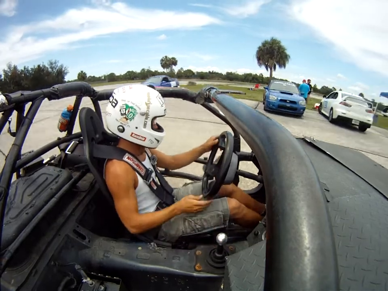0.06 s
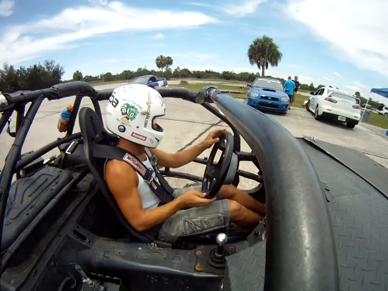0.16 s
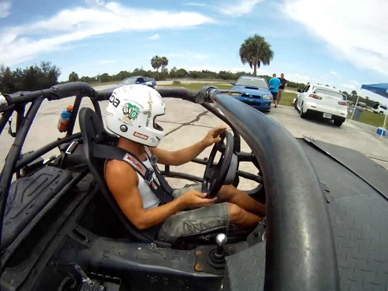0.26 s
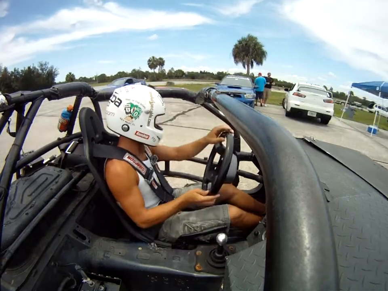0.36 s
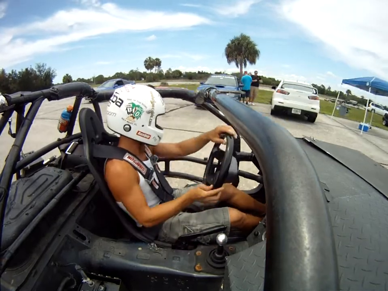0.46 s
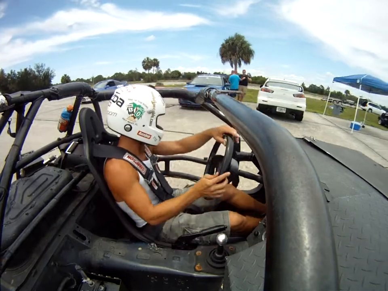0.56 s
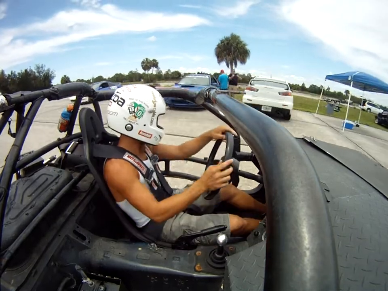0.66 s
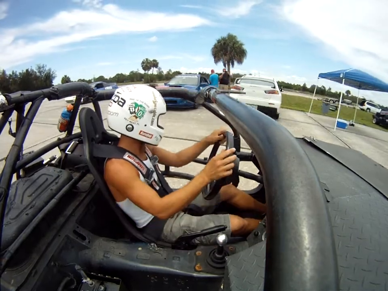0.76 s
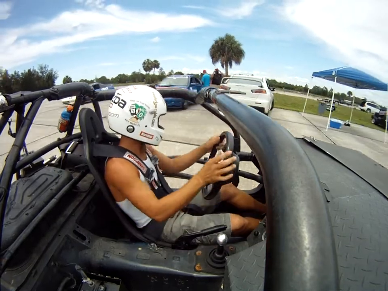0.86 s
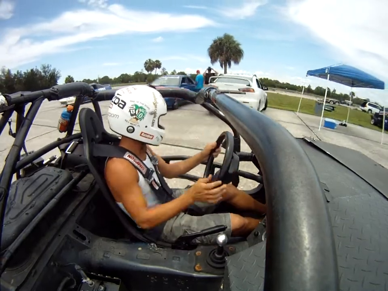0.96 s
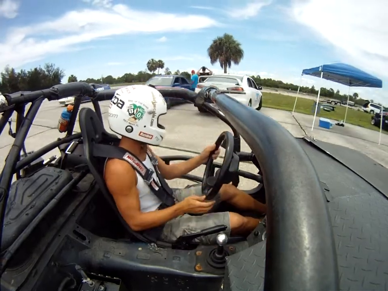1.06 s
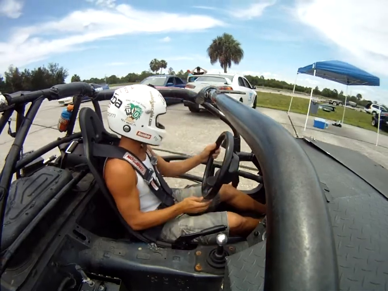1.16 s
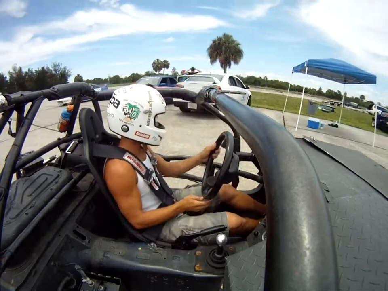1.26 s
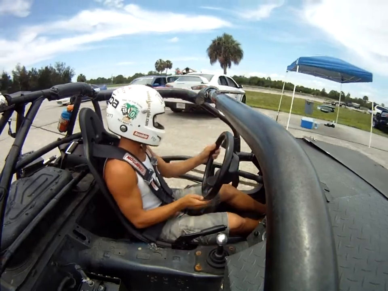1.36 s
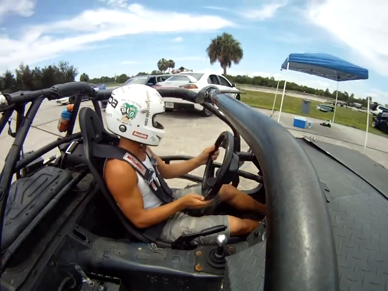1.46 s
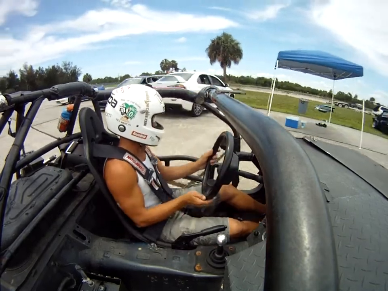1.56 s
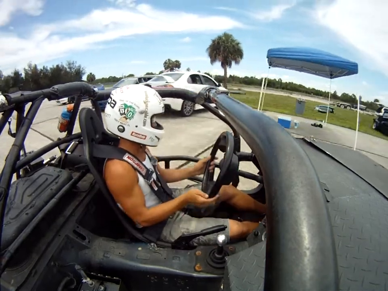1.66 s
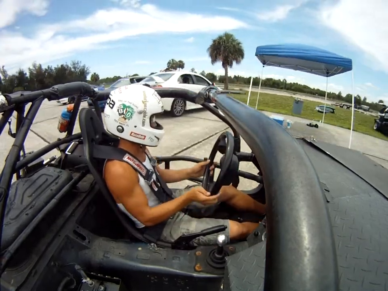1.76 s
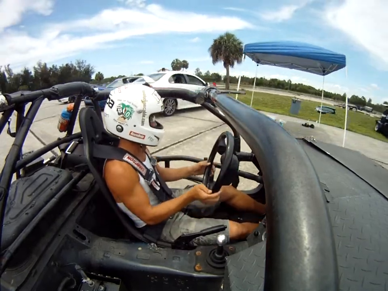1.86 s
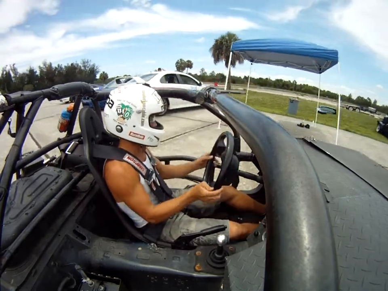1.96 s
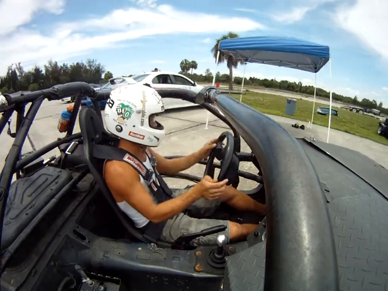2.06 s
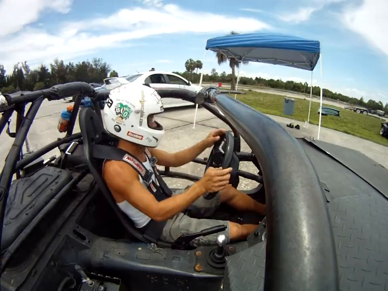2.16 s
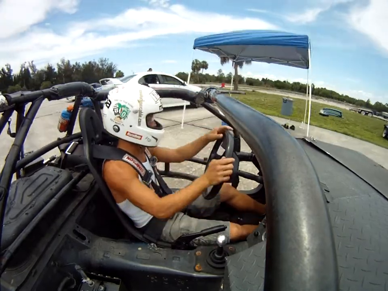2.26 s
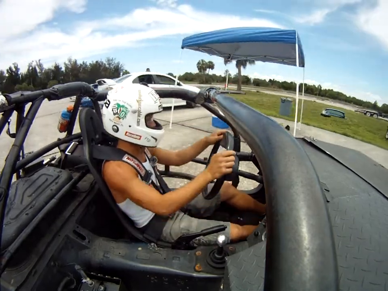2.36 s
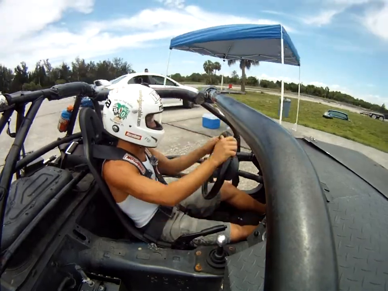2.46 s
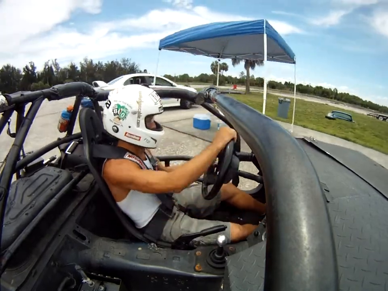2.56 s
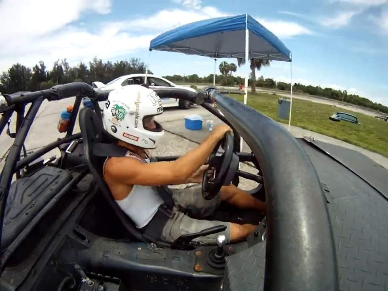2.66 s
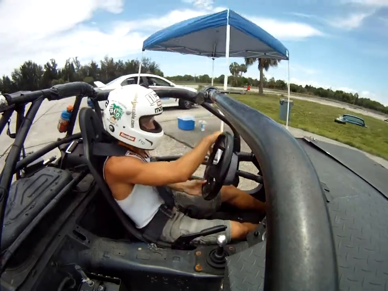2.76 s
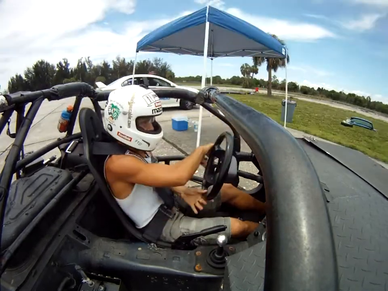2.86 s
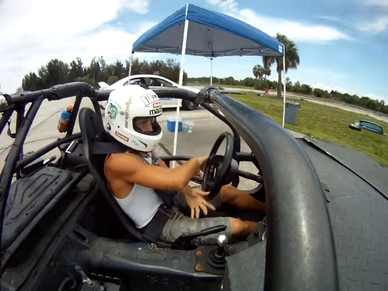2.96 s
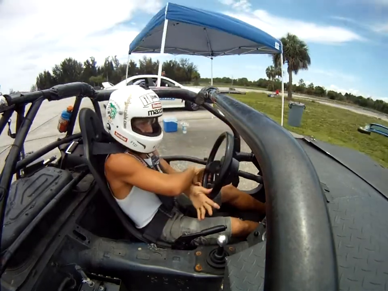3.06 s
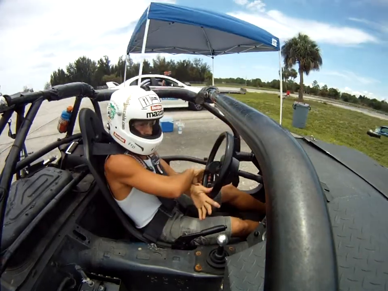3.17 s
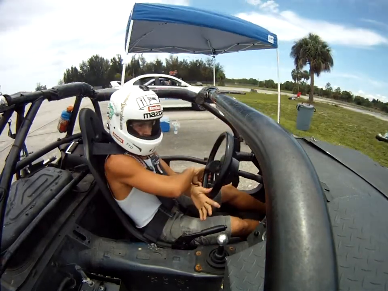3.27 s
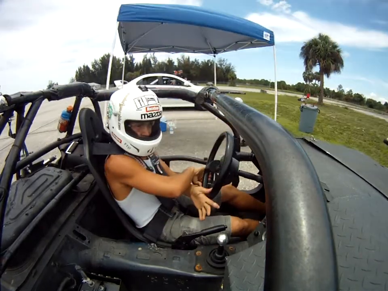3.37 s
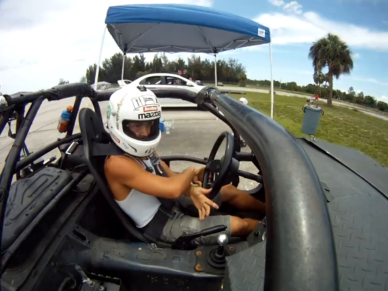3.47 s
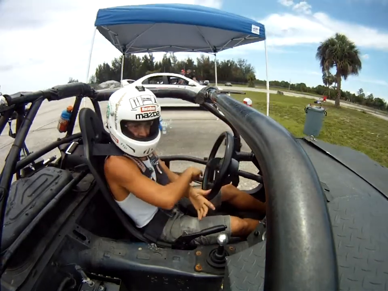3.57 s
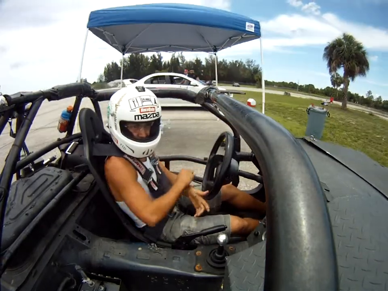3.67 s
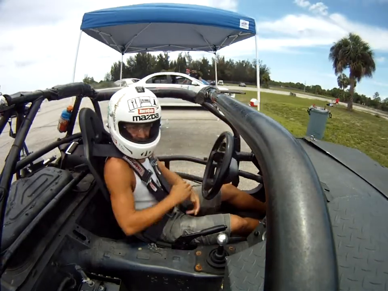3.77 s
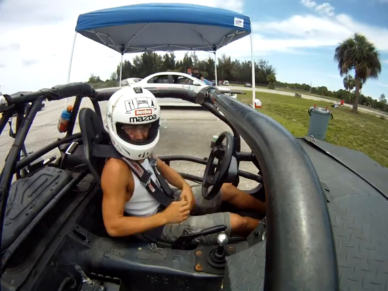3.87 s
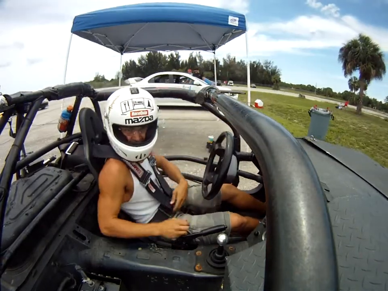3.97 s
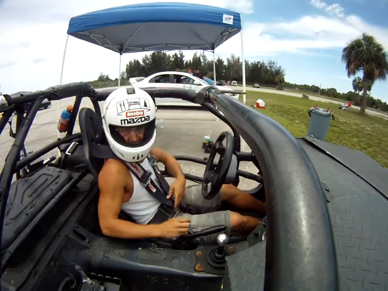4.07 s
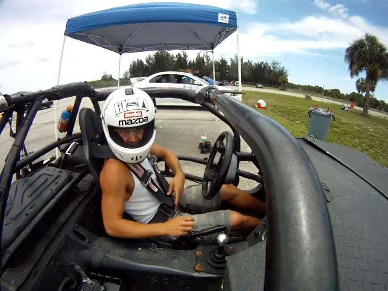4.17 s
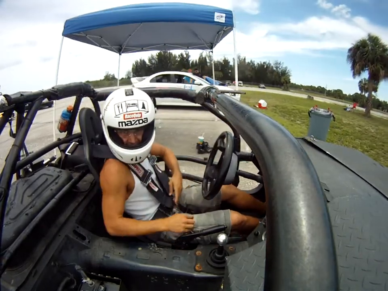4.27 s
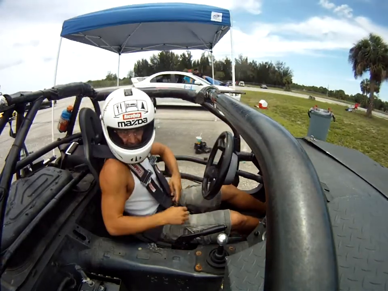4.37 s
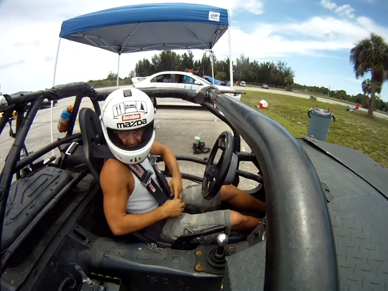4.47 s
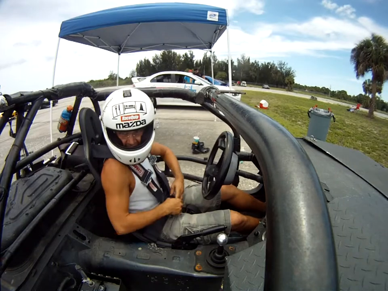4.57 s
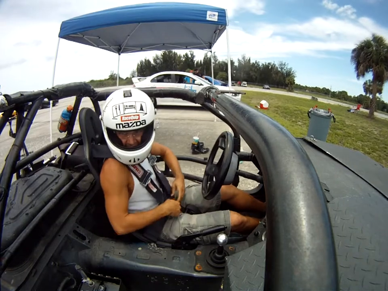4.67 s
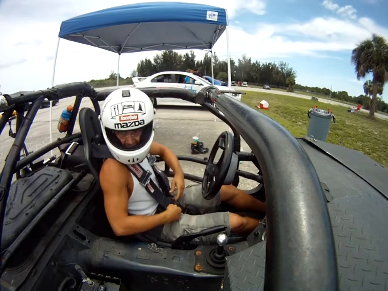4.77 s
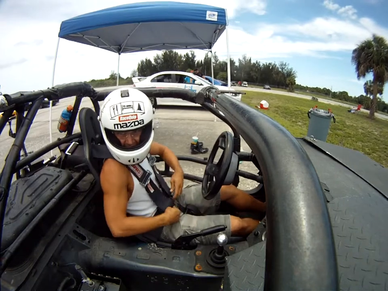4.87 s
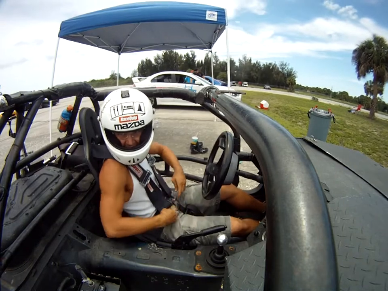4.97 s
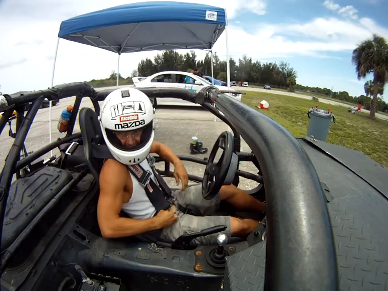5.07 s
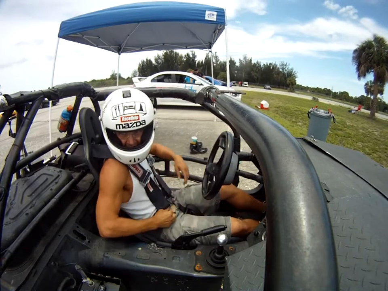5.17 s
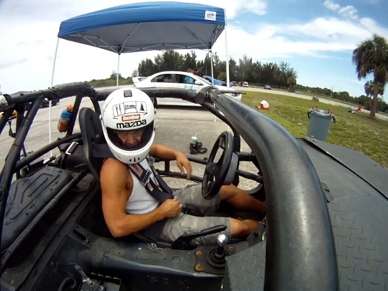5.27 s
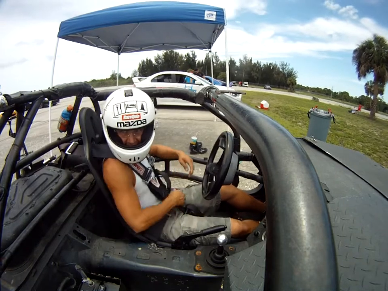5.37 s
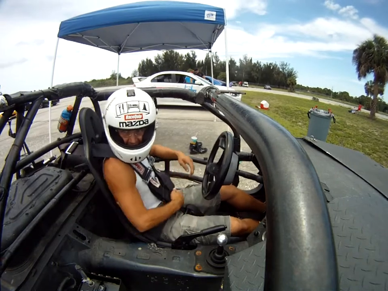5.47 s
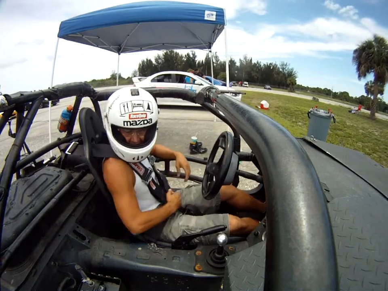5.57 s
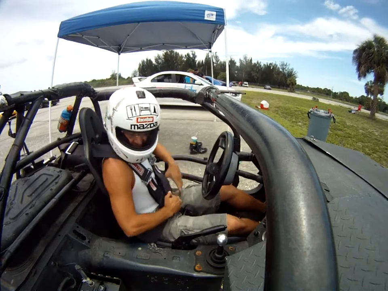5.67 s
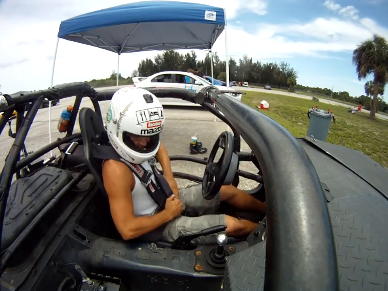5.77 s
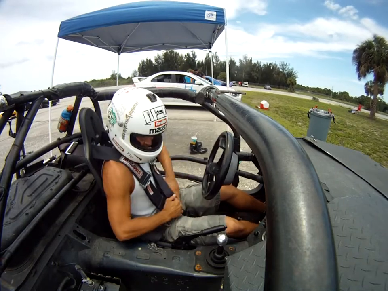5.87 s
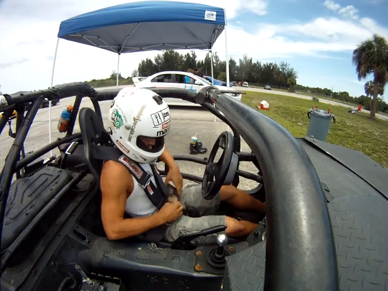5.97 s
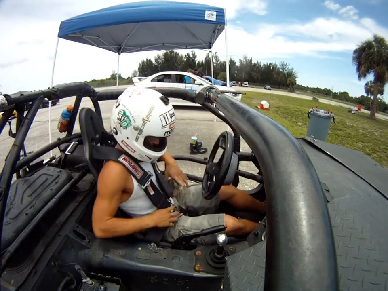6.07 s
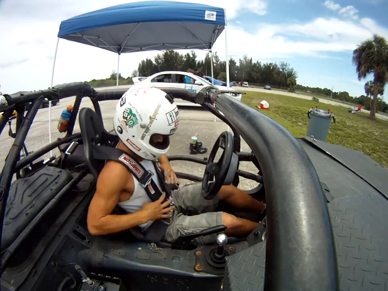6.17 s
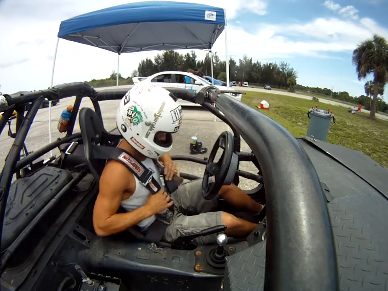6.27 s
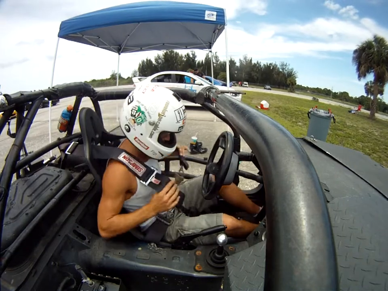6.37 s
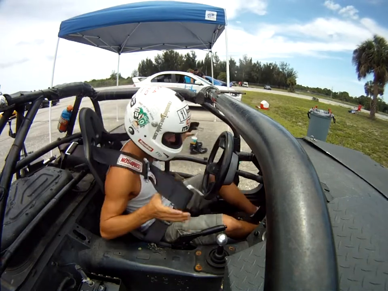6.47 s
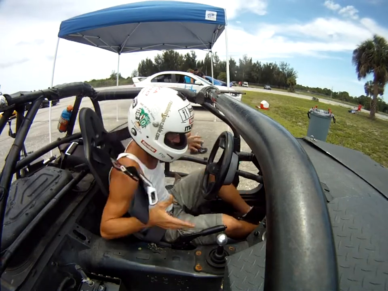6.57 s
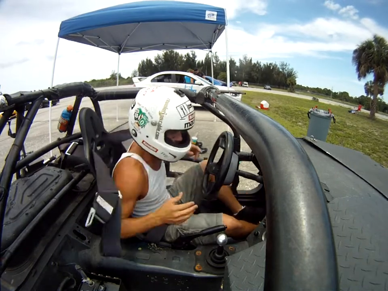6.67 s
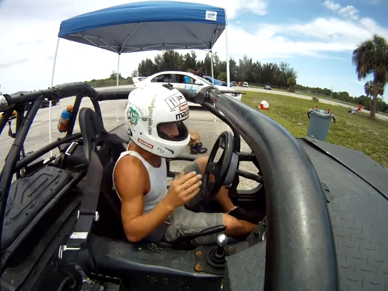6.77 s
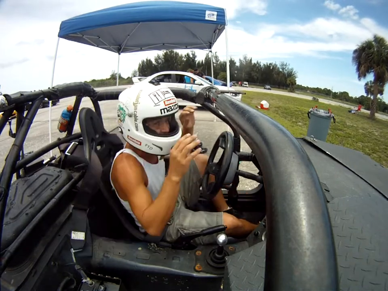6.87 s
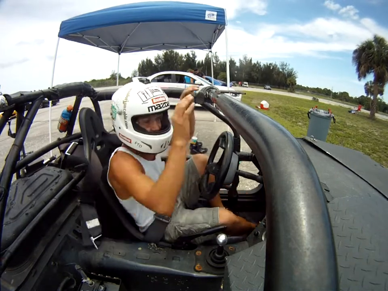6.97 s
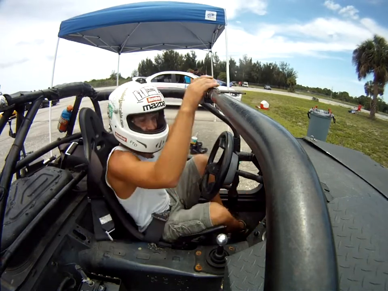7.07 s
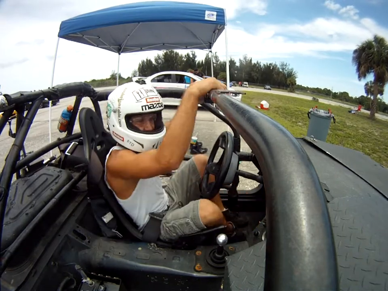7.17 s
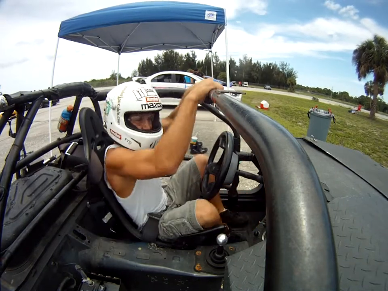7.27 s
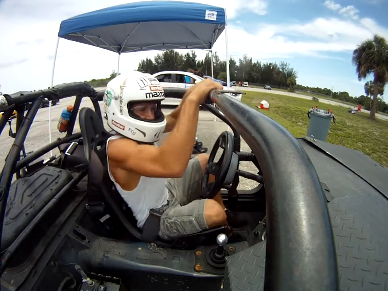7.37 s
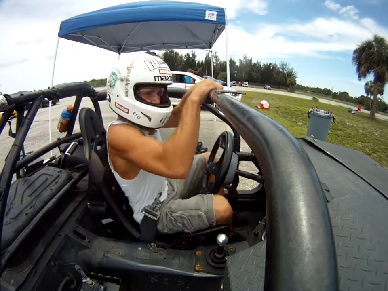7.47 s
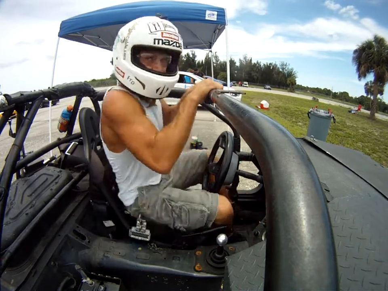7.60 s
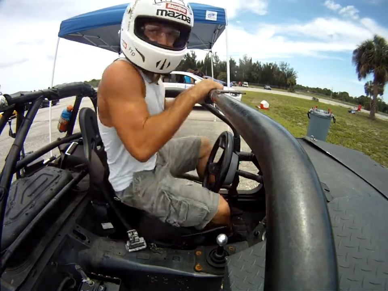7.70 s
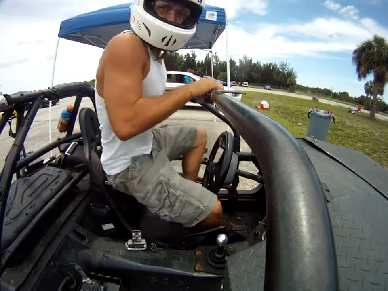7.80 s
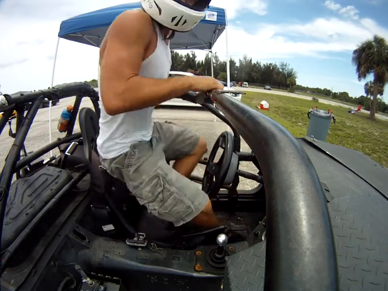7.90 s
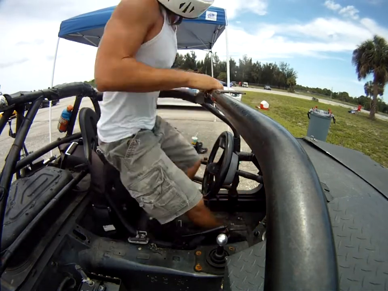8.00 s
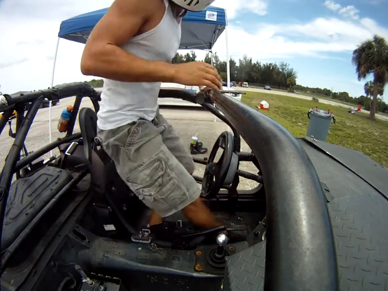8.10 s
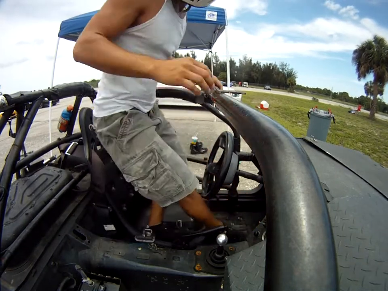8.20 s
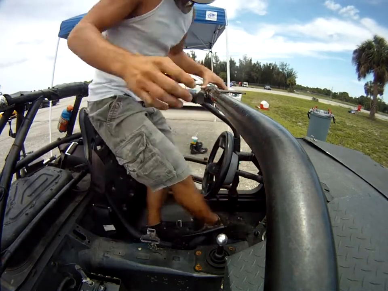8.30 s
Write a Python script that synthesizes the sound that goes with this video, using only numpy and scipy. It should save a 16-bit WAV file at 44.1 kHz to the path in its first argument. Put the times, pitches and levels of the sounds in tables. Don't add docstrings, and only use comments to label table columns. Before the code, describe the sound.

Muffled low rolling rumble, one buzzing engine rev that sinks and dies, a quiet pause, then sharp metal clinks, strap slaps and foot knocks close by.

```python
import sys
import numpy as np
from scipy import signal
from scipy.io import wavfile
from scipy.ndimage import uniform_filter1d

SR = 44100
rng = np.random.default_rng(int(sys.argv[2]) if len(sys.argv) > 2 else 0)


def gain_from_db(level_db):
    decades = np.asarray(level_db, float) / 20
    return 10 ** decades


def transcribe(u):
    v = np.clip(np.atleast_2d(u).T, -1, 1)
    q = np.round(v * 32767).astype(np.int16)
    wavfile.write(sys.argv[1], SR, q)


N = 367794

# centre_hz, width_hz, level_db
SEAT_MODES = [(146.5, 45, 6), (288, 68, -7), (377, 46, -7)]
# centre_hz, width_hz, level_db
DRONE_MODES = [(207, 100, -6.5), (314.3, 26, 6), (393, 80, -1), (449, 123, -8), (550, 590, -20)]
# centre_hz, width_hz, level_db
CASE_MODES = [(711.4, 49.5, 1), (963, 77, 1.5), (1160, 114, 2), (1450, 109, -1.5), (1592, 198, -2.5),
              (1853, 108, -1), (2096, 100, 0), (2560, 245, -8), (2794, 460, -12)]
# centre_hz, width_hz, level_db
SHELL_MODES = [(2523, 138, 29.5), (2920, 3400, 1), (2830, 300, -35), (3686, 96, 18.5), (3960, 96, 16),
               (5200, 420, 2.5)]
# centre_hz, width_hz, level_db
HISS_BANDS = [(2470, 2500, 6), (3595, 360, 7), (4154, 1310, 3.5), (5710, 200, 0)]
# peak_s, level_db, rise_s, fall_s
WEIGHT_SHIFTS = [
    (6.99, -44, 0.36, 0.99),
    (7.3, -54, 0.66, 1),
    (7.74, -31, 0.085, .14),
    (8.03, -43, 0.16, 0.62),
    (8.3, -60, 0.35, .4),
]


def curves(rows):
    s, *columns = np.transpose(rows)
    return [np.interp(np.arange(N) / SR, s, c) for c in columns]


def rms_one(x):
    return x / np.sqrt(np.mean(x ** 2) + 1e-20)


def drift(rate):
    steps = rng.standard_normal(4000)
    return np.interp(np.arange(N) / SR * rate * 2, np.arange(len(steps)), steps) * 1.33


def resonate(x, modes, passes=1, gains_db=None):
    total = 0
    for k, (hz, width, db) in enumerate(modes):
        r = np.exp(-np.pi * width / SR)
        poles = [1, -2 * r * np.cos(2 * np.pi * hz / SR), r * r]
        y = x
        for _ in range(passes):
            y = signal.lfilter([(1 - r * r) / 2, 0, (r * r - 1) / 2], poles, y)
        gain_db = db + (0 if gains_db is None else gains_db[k])
        total = total + (-1) ** k * gain_from_db(gain_db) * y
    return total


def shaken(modes, passes, patchy_db, rate):
    flicker = [patchy_db * drift(rate) for _ in modes]
    return rms_one(resonate(rng.standard_normal(N), modes, passes, flicker))


def evened(x, amount):
    envelope = np.sqrt(uniform_filter1d(x ** 2, size=SR // 20) + .02)
    return rms_one(x / envelope ** amount)


def swells(rows):
    span_db = 20
    t = np.arange(0, N + 64, 64) / SR
    power = 0
    for s, db, rise, fall in rows:
        away = np.maximum((s - t) / rise, (t - s) / fall)
        power = power + gain_from_db(2 * (db - span_db * away))
    return np.interp(np.arange(N) / SR, t, power)


def follow(shake_db, full_db, share, lumps_db, extra):
    full_shake_db = -17.5
    level_db = full_db + share * (shake_db - full_shake_db) + lumps_db * drift(5.1)
    return 10 * np.log10(gain_from_db(2 * level_db) + extra)


def engine():
    # start_s, firing_hz, effort_db, burble_db
    rev = [
        (2.2, 73.2, -35, -45),
        (2.29, 84, -30, -48),
        (2.38, 96.1, -24, -52),
        (2.47, 120.6, -14, -48),
        (2.55, 143, -11, -45),
        (2.6, 156, -12, -37),
        (2.66, 157.5, -12, -37),
        (2.79, 152.6, -15, -41),
        (3.13, 129.5, -11.5, -38),
    ]
    # start_s, firing_hz, effort_db, burble_db
    run_down = [
        (3.431, 111.3, -15.5, -37),
        (3.762, 94.57, -19, -42),
        (4.031, 81, -16.5, -71),
        (4.17, 77.8, -14.5, -50),
        (4.29, 74.9, -27.5, -54),
        (4.439, 68, -33, -52),
        (4.621, 55.37, -23, -74),
        (4.86, 45, -23, -60),
        (5.3, 31.55, -39, -48),
    ]
    # tone_hz, level_db
    mount = [(45, 0), (62, -17), (80, -6.5), (93, -8), (113, -24), (126, -6.5), (160, -2), (178, -33)]
    # multiple, level_db
    burble_orders = [(1.5, 9.5), (2, 0.5), (2.5, -19), (3, 1.5), (3.5, -3), (4, 8), (5, 8)]
    mount_hz, mount_db = np.transpose(mount)

    def through_mount(tone_hz):
        return np.interp(np.log(tone_hz), np.log(mount_hz), mount_db)

    hz, effort_db, upper_db = curves(rev + run_down)
    t = np.arange(N) / SR
    running = np.clip(np.minimum(t - rev[0][0], run_down[-1][0] - t) * 20, 0, 1)
    phase = 2 * np.pi * np.cumsum(hz) / SR

    one_db = effort_db + through_mount(hz) + 1.5 * drift(21.0)
    two_db = effort_db + through_mount(2 * hz) + 0.5
    two_db = two_db + .3 * np.minimum(2 * hz - 146, 0)
    uneven = 1 + 0.012 * np.sin(phase / 2) + 0.023 * drift(27)
    tone = gain_from_db(one_db) * np.sin(phase) * uneven + gain_from_db(two_db) * np.sin(2 * phase + 2.0)

    half_db = effort_db + through_mount(hz / 2) - 15 + 0.39 * (upper_db + 24)
    tone = tone + gain_from_db(half_db + 3.0 * drift(6)) * np.sin(phase / 2 + .4 * drift(5))

    upper = sum(gain_from_db(db + 2.5 * drift(8)) * np.sin(k * phase + .3 * drift(9)) for k, db in burble_orders)
    upper = resonate(gain_from_db(upper_db - 5.5) * upper, DRONE_MODES)
    return np.sqrt(2) * running * (tone + upper), phase, running, running * gain_from_db(2 * effort_db)


def cage_rumble(shake_db):
    # centre_hz, width_hz, level_db
    cage_modes = [(36.7, 14.8, 3), (59.8, 19.3, 1), (92.8, 15.6, -9)]
    return gain_from_db(shake_db + drift(4.0)) * evened(shaken(cage_modes, 2, 0.24, 18.0), 0.11)


def floor_boom(shake_db):
    # centre_hz, width_hz, level_db
    pan_modes = [(131.6, 10.4, -5.5), (157.3, 12.1, -1)]
    # peak_s, level_db, rise_s, fall_s
    seams = [(0.0, 5.5, 0.11, 0.016), (.52, -25.5, 0.15, 0.023), (.8, -24.5, 0.2, 0.13),
             (.96, -24, 0.14, 0.29), (1.4, -28, 0.6, 0.37), (1.92, -26, 0.39, 0.38),
             (2.31, -20.5, 0.21, 0.28), (2.55, -27.5, 0.13, 0.66), (2.95, -25.5, 0.13, 0.51),
             (3.25, -28, 0.29, 0.063), (4.21, -37, 0.27, 0.47), (4.95, -48, 1, 0.54)]
    # peak_s, level_db, rise_s, fall_s
    caught = [
        (2.5, -23, 0.3, 0.11),
        (3.27, -25, 0.43, .12),
    ]
    pushes = swells(seams) + gain_from_db(2 * 9) * swells(WEIGHT_SHIFTS[3:])
    boom_db = follow(shake_db, -30.5, 0.95, 1.5, pushes)
    boom = gain_from_db(boom_db) * evened(shaken(pan_modes, 2, 0.33, 8.6), 0.32)
    return boom + np.sqrt(swells(caught)) * evened(shaken(pan_modes[:1], 2, 0.3, 9.2), 0.78)


def seat_drone(shake_db, effort):
    pushes = gain_from_db(2 * -25.5) * effort + gain_from_db(2 * 2.5) * swells(WEIGHT_SHIFTS[2:4])
    drone_db = follow(shake_db, -41, 0.81, 1.0, pushes)
    return gain_from_db(drone_db) * shaken(DRONE_MODES, 1, 2.2, 8)


def case_buzz(shake_db, phase, running, effort):
    # peak_s, level_db, rise_s, fall_s
    rattles = [
        (2.55, -28.5, 0.05, 0.095),
        (3.17, -25, 0.21, 0.063),
        (3.45, -40.5, 0.24, 0.8),
        (4.19, -30.5, 0.37, 0.13),
        (1.86, -48, 0.07, .2),
        (2.2, -43.5, 0.14, 0.3),
    ]
    # peak_s, level_db, rise_s, fall_s
    roars = [
        (2.54, -24.5, 0.092, 0.15),
        (3.02, -29, 0.17, 0.13),
        (3.15, -25, 0.33, 0.056),
        (3.95, -38.5, 0.064, 0.72),
        (4.19, -26, 0.38, 0.12),
    ]
    # centre_hz, width_hz, level_db
    lid_modes = [(766.4, 51, 3.5), (1210, 175, 0.5), (1520, 142, 2.5)]
    # peak_s, level_db, rise_s, fall_s
    sizzles = [
        (4.12, -55.5, .4, .25),
        (6.27, -54, 0.035, .1),
        (8.4, -49.5, 0.075, .15),
        (8.06, -50, 0.035, 0.067),
        (6.8, -57, .03, 0.09),
    ]
    firing = gain_from_db(2 * -19) * effort * swells([(2.75, 0.0, 1, 2.27)])
    buzz_db = follow(shake_db, -43.5, 0.53, 1.6, firing + swells(rattles) + swells(WEIGHT_SHIFTS))
    pulsing = 1 + 0.036 * running * np.sin(phase + 1.0)
    buzz = gain_from_db(buzz_db) * pulsing * shaken(CASE_MODES, 1, 0.98, 12)
    buzz = signal.sosfilt(signal.butter(3, 3000.0, fs=SR, output="sos"), buzz)
    shell = gain_from_db(0.87 * buzz_db - 25.0) * shaken(SHELL_MODES[1:], 1, 3.6, 27)
    lid = gain_from_db(1.58 * buzz_db + 13.0) * shaken(CASE_MODES[2:5], 2, 2.7, 25)
    roar = np.sqrt(swells(roars)) * shaken(lid_modes, 2, 1.0, 20)
    sizzle = np.sqrt(swells(sizzles)) * shaken(HISS_BANDS[1:], 2, 3.6, 40)
    return buzz + shell + lid + roar + sizzle


def latch():
    # start_s, peak_db
    ticks = [(2.604, -25), (2.7752, -29), (2.8205, -32), (2.8679, -32), (2.9033, -24.5), (4.117, -48),
             (4.152, -48), (4.178, -52), (4.203, -54), (5.226, -40), (6.197, -31), (7.671, -20),
             (7.696, -42), (7.713, -23), (7.722, -35), (7.747, -25), (7.756, -31), (7.767, -33),
             (7.779, -38)]
    # loudest_s, period_s, level_db, gain_db per tick, loss_db per tick
    chatters = [
        (2.5643, .0155, -18, 5, 26),
        (3.153, .0155, -14, 1.85, 4.5),
    ]
    # centre_hz, width_hz, level_db
    latch_modes = [(3730, 330, -3), (5320, 450, -5.5), (2240, 99, 4)]
    bounce_s, scatter_s, jitter_s = .0065, .004, .0009
    runs = []
    for s, period, db, gain_db, loss_db in chatters:
        for k in range(-7, 5):
            tick_s = s + k * period + jitter_s * rng.standard_normal()
            runs.append((tick_s, db - max(-k * gain_db, k * loss_db)))
    clicks = np.full(N, 1e-18)
    for s, db in runs + ticks:
        clicks[round(s * SR)] = gain_from_db(db + 29.5)
        clicks[round((s + bounce_s) * SR)] = -gain_from_db(db + 22.5)
    tail = signal.lfilter([gain_from_db(-21)], [1, -np.exp(-1 / (scatter_s * SR))], np.abs(clicks))
    return resonate(clicks + tail * rng.standard_normal(N), latch_modes, passes=2)


def knocks(rows, thud_db, bright_db, low_modes):
    # centre_hz, width_hz, level_db
    tube_modes = [(740, 37, -15.5), (1065, 14, 1.5), (1110, 9.9, -1), (1299, 12, -2.5), (1553, 20, -0.5),
                  (1610, 71, 1.5), (1960, 200, -12), (1925, 22, -32), (2110, 39, -4.5), (2370, 41, -22)]
    mix, t = np.zeros(N + SR), np.arange(SR // 4) / SR
    noise = rng.standard_normal((len(rows), len(t)))
    spread = rng.standard_normal((len(rows), len(tube_modes)))
    dull = signal.butter(4, 2500.0, fs=SR, output="sos")
    for (s, db, hz, t60), white, tilt in zip(rows, noise, spread):
        decay = t / max(t60, .01)
        envelope = np.minimum(t / 0.0049, 1) * (gain_from_db(-60 * decay) + gain_from_db(-25.5 - 20 * decay))
        burst = white * (1.9 + white ** 2) * envelope
        body = resonate(burst, tube_modes, gains_db=3 * tilt)
        body = body + gain_from_db(-2.0) * resonate(burst, CASE_MODES[1:])
        body = body + gain_from_db(9.5) * resonate(burst, [(hz, 60.0, 1.5)])
        body = signal.sosfilt(dull, body)
        thud = resonate(burst, low_modes, 2, gains_db=1.5 * tilt)
        bright = resonate(burst * gain_from_db(-60.0 * t), SHELL_MODES, gains_db=1.1 * tilt)
        at = round((s - .003) * SR)
        for y, level_db in [(body, db), (thud, db + thud_db), (bright, db + bright_db)]:
            mix[at:at + len(t)] += gain_from_db(level_db + 3.0) * y / np.abs(y).max()
    return mix[:N]


def frame_knocks():
    # start_s, peak_db, ring_hz, t60_s
    jolts = [
        (0.028, -30.5, 1160, 0.085),
        (0.533, -32.5, 1140, 0.17),
        (0.927, -34.5, 1440, 0.13),
        (1.449, -38.5, 1520, 0.14),
        (6.168, -22.5, 1193, 0.07),
        (6.215, -27.5, 708, 0.46),
    ]
    # start_s, peak_db, ring_hz, t60_s
    clinks = [
        (1.09, -36, 1040, 0.014),
        (5.311, -42.5, 1450, 0.26),
        (6.206, -9.5, 1215, 0.12),
        (6.251, -21.5, 1184, 0.15),
        (6.279, -27, 1010, 0.047),
        (7.018, -12, 1940, 0.12),
        (7.222, -29.5, 1160, 0.057),
        (7.249, -29, 1090, 0.024),
        (7.314, -15.5, 1060, 0.13),
    ]
    # start_s, peak_db, ring_hz, t60_s
    straps = [(6.867, -13.5, 1450, 0.063), (6.89, -20, 1100, 0.082), (7.072, -24, 1244, 0.089),
              (7.343, -16.5, 1550, 0.066), (7.374, -30, 1610, 0.028), (7.405, -10, 1835, 0.067),
              (7.435, -25.5, 1190, 0.12), (7.472, -32.5, 1180, 0.16), (7.504, -34, 1060, 0.2),
              (7.636, -26, 1090, 0.064), (7.791, -22.5, 1037, 0.02), (8.05, -13.5, 1603, 0.13),
              (8.073, -16.5, 1140, 0.053), (8.163, -24, 1100, 0.015), (8.279, -33, 1100, 0.072)]
    hits = knocks(jolts, 0.35, -26, SEAT_MODES)
    hits = hits + knocks(clinks, -21, -6.5, SEAT_MODES)
    return hits + knocks(straps, -23.5, -14.5, SEAT_MODES)


def slam():
    slam_s, length_s = 6.8625, 0.011
    place = (np.arange(N) / SR - slam_s) / length_s
    white = rng.standard_normal(N)
    mid = rms_one(resonate(white, [(740, 150, -15), (1122, 125, -4.5), (1550, 530, -1.7), (1780, 400, 2.0)]))
    swell = np.exp(-(3 * place) ** 2) + 0.1 * np.exp(-place ** 2)
    return gain_from_db(-3) * mid * swell + gain_from_db(-30) * white * np.exp(-(6 * place) ** 2)


def footfalls():
    # centre_hz, width_hz, level_db
    footwell_modes = [(124, 54, 5), (314, 51, -24), (395, 54, 1.0), (636, 160, -16.5)]
    # start_s, peak_db, ring_hz, t60_s
    steps = [
        (7.669, -14.5, 963, 0.073),
        (7.714, -14, 1535, 0.06),
        (7.747, -14.5, 1610, 0.088),
        (7.942, -17.5, 1610, 0.061),
        (8.228, -31, 1045, 0.046),
    ]
    # start_s, peak_db, ring_hz, t60_s
    weight_drop = [
        (7.653, -18, 2240, 0.08),
    ]
    return knocks(steps, -10.5, -11, footwell_modes) + knocks(weight_drop, 5.7, -10, footwell_modes)


def seat_blows():
    # start_s, peak_db, ring_hz, t60_s
    scuff = [
        (7.95, -23.5, 1050, 0.091),
    ]
    # start_s, peak_db, ring_hz, t60_s
    creaks = [
        (4.449, -35.5, 1160, 0.11),
        (4.618, -44, 1160, 0.076),
        (4.665, -39, 1160, 0.17),
        (6.11, -40, 1090, 0.081),
    ]
    # start_s, peak_db, ring_hz, t60_s
    thumps = [
        (6.172, -35, 560, 0.085),
        (6.9, -42, 940, 0.042),
        (7.768, -23, 1500, 0.054),
        (8.3, -38, 2200, .12),
        (7.73, -30, 1500, .05),
        (7.97, -33, 1150, .1),
        (6.23, -21.5, 940, 0.037),
    ]
    blows = knocks(scuff, 0.8, -29, [(290, 61, 0.1)])
    blows = blows + knocks(creaks, 0.8, -29, SEAT_MODES[2:])
    blows = blows + knocks(thumps[:1], 14.0, -30, SEAT_MODES[1:])
    return blows + knocks(thumps[1:], -9, -29, SEAT_MODES[1:])


def squeals():
    # start_s, end_s, pitch_hz, level_db
    whistles = [
        (4.853, 5.327, 1550, -57.5),
        (5.223, 5.239, 3330, -43),
        (5.525, 5.594, 1450, -55),
        (5.568, 5.584, 5150, -51),
        (5.675, 5.703, 2550, -48),
        (6.916, 7.03, 1925, -38.5),
        (8, 8.04, 5700, -52),
        (8.105, 8.14, 4100, -53),
        (5.218, 5.24, 5200, -52),
    ]
    t = np.arange(N) / SR
    total = 0
    for a, b, hz, db in whistles:
        gate = np.clip(np.minimum(t - a, b - t) * 100, 0, 1)
        total = total + gain_from_db(db + .5 * drift(18)) * gate * np.sin(2 * np.pi * hz * t)
    return total


def valve_gear():
    # start_s, rate_hz
    puff_rate = [
        (0, 53),
        (1.2, 54),
        (2.2, 53),
        (5.3, 54),
        (5.8, 50),
        (6.3, 47),
        (8.34, 48),
    ]
    # start_s, end_s, level_db
    spells = [(0, 0.008, -47.5), (0.063, 0.384, -64.5), (0.564, 0.663, -61), (0.994, 1.3, -61),
              (1.463, 2.15, -64.5), (2.21, 2.93, -52), (2.976, 3.24, -53.5), (3.3, 4.303, -69),
              (5.203, 5.452, -63.5), (5.62, 6.174, -68), (6.36, 6.476, -62.5), (6.472, 6.898, -65),
              (7.13, 7.32, -71), (7.59, 8.13, -67)]
    rest_db, edge_db_per_s = -75, 411
    t = np.arange(N) / SR
    per_s, = curves(puff_rate)
    level_db = np.full(N, float(rest_db))
    for a, b, db in spells:
        outside_s = np.minimum(np.minimum(t - a, b - t), 0)
        level_db = np.maximum(level_db, db + edge_db_per_s * outside_s)
    level_db = level_db + drift(3.4)
    place = np.cumsum(per_s) / SR + .12 * drift(20) + 1
    place = place + .1 * np.sin(np.pi * place)
    strength = gain_from_db(2.7 * rng.standard_normal(1000))
    gate = .12 + strength[place.astype(int)] * np.abs(np.sin(np.pi * place)) ** 3.5
    return gain_from_db(level_db + 3.5) * rms_one(gate * resonate(rng.standard_normal(N), HISS_BANDS, passes=2))


def puffs():
    # start_s, peak_db
    rolling_puffs = [(0.0608, -40), (0.1092, -39), (0.1266, -35), (0.1531, -48), (0.168, -44), (0.187, -39),
                     (0.2264, -37), (0.2673, -34), (0.2853, -42), (0.3102, -37), (0.3536, -39),
                     (0.4165, -47), (0.4504, -39), (0.5033, -45), (0.5641, -42), (0.6175, -40),
                     (0.7053, -49), (0.7647, -45), (0.7736, -41), (0.8844, -48), (0.9916, -39),
                     (1.0161, -40), (1.051, -40), (1.065, -39), (1.0904, -32), (1.1099, -37), (1.1313, -39),
                     (1.1653, -39), (1.2037, -36), (1.2371, -40), (1.269, -41), (1.2945, -43),
                     (1.3144, -45), (1.3663, -47), (1.4137, -50), (1.4306, -44), (1.4541, -45),
                     (1.4711, -43), (1.4885, -39), (1.507, -41), (1.5334, -44), (1.6257, -47),
                     (1.6467, -45), (1.6661, -44), (1.696, -43), (1.7454, -45), (1.7669, -42),
                     (1.7908, -44), (1.8078, -43), (1.8662, -37), (1.9016, -38), (1.9445, -41),
                     (1.9729, -41), (2.0103, -45), (2.0343, -44), (2.0712, -46), (2.0916, -50),
                     (2.135, -48), (2.1949, -42), (2.2104, -40)]
    # start_s, peak_db
    slowing_puffs = [(3.8902, -55), (3.9711, -51), (3.9935, -48), (4.0519, -44), (4.0633, -39),
                     (4.1492, -51), (4.1591, -46), (4.1769, -50), (4.2085, -47), (4.3128, -51),
                     (4.3357, -49), (4.396, -45.5), (4.4599, -51)]
    # start_s, peak_db
    resting_puffs = [(5.2262, -46), (5.2593, -58), (5.2757, -54), (5.3012, -42), (5.3363, -38.5),
                     (5.3695, -41.5), (5.406, -50), (5.426, -51), (5.4474, -53), (5.5192, -52),
                     (5.5586, -51), (5.5731, -54), (5.607, -55), (5.6309, -48), (5.6709, -46.5),
                     (5.7153, -47), (5.7357, -46), (5.7522, -44), (5.7896, -44), (5.811, -48), (5.831, -58),
                     (5.9083, -49), (5.9258, -47), (5.9467, -48), (5.9712, -46), (5.9966, -53),
                     (6.015, -43), (6.036, -53), (6.055, -49), (6.0829, -53), (6.1054, -48), (6.1263, -50),
                     (6.1488, -49), (6.1692, -50)]
    # start_s, peak_db
    late_puffs = [
        (6.303, -42),
        (6.325, -42.5),
        (6.345, -44),
        (7.115, -52),
        (7.135, -48),
        (7.152, -50),
        (7.175, -51),
        (7.195, -52),
        (7.213, -49),
    ]
    # centre_hz, width_hz, level_db
    jet_bands = [(3485, 870, 5.5), (4425, 830, 6), (5610, 540, 1)]
    puff_db, mate_s, mate_db, rise_s, fall_s = -7, .015, -2.5, 0.0015, 0.0041
    s, db = np.transpose(sorted(rolling_puffs + slowing_puffs + resting_puffs + late_puffs))
    room_s = np.diff(s, append=s[-1])
    paired = (room_s > .029) & (room_s < .05)
    marks = np.full(N, 1e-18)
    marks[np.round(s * SR).astype(int)] = gain_from_db(db + puff_db)
    marks[np.round((s[paired] + mate_s) * SR).astype(int)] = gain_from_db(db[paired] + puff_db + mate_db)
    rise, fall = np.exp(-1 / (rise_s * SR)), np.exp(-1 / (fall_s * SR))
    shape = signal.lfilter([2 - 2 * rise], np.convolve([1, -rise], [1, -fall]), marks)
    return shape * rms_one(resonate(rng.standard_normal(N), jet_bands, passes=2))


def scene():
    # start_s, level_db
    shaking = [(0, -15.5), (.5, -18), (.8, -18.5), (.9, -24), (2.05, -24.5), (2.5, -21.5), (3.3, -21.5),
               (3.9, -29.5), (4.25, -21), (4.6, -30), (4.85, -31.5), (5.2, -33.5), (5.8, -33), (6.8, -33.5),
               (7.5, -35), (7.75, -28), (7.9, -37), (8.34, -31.5)]
    shake_db, = curves(shaking)
    tones, phase, running, effort = engine()
    body = cage_rumble(shake_db) + floor_boom(shake_db) + seat_drone(shake_db, effort)
    body = body + case_buzz(shake_db, phase, running, effort)
    blows = latch() + frame_knocks() + slam() + footfalls() + seat_blows() + squeals()
    return (tones + body + blows + valve_gear() + puffs())[None]


def roll_off(x):
    return signal.sosfilt(signal.butter(12, 15420, fs=SR, output="sos"), x)


def record(dry):
    slow = signal.resample_poly(dry, 40, 147, axis=1)
    held = np.repeat(np.clip(slow, -.98, .98), 4, axis=1)
    mix = signal.resample_poly(held, 147, 160, axis=1)[:, :N]
    return roll_off(mix)


dry = scene()
out = record(dry)
transcribe(out)
```